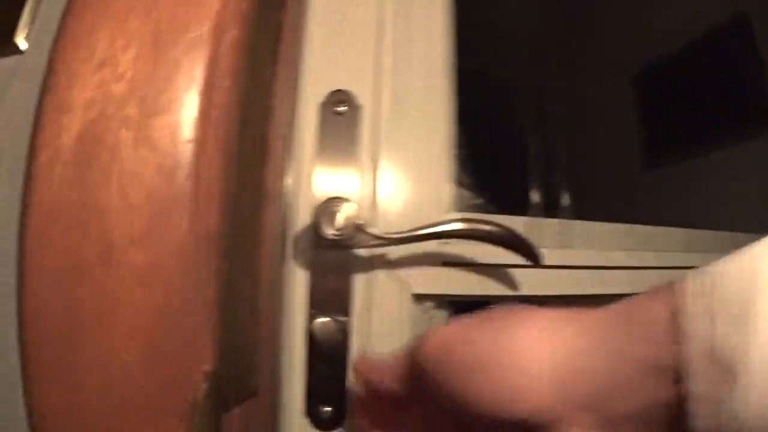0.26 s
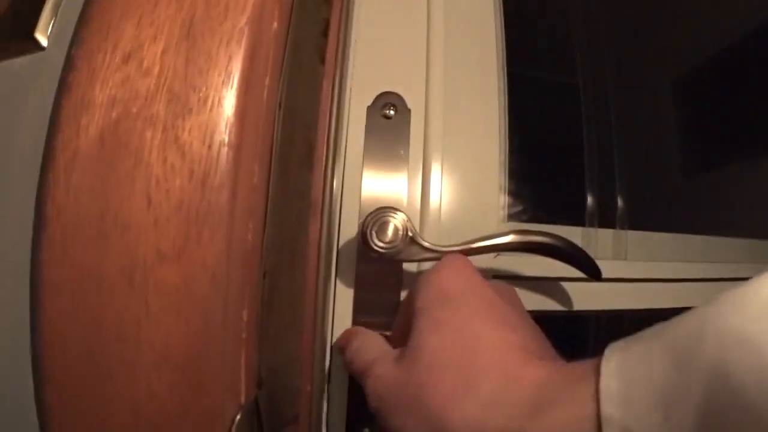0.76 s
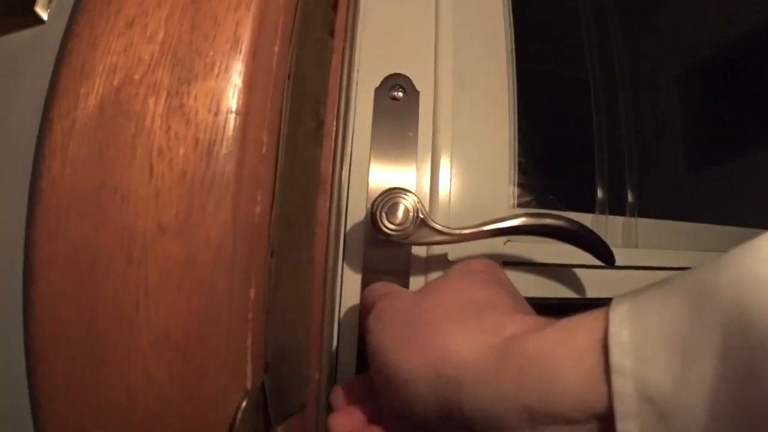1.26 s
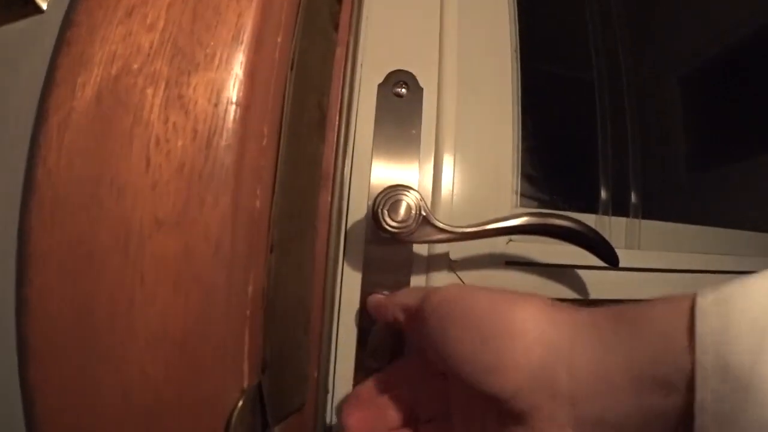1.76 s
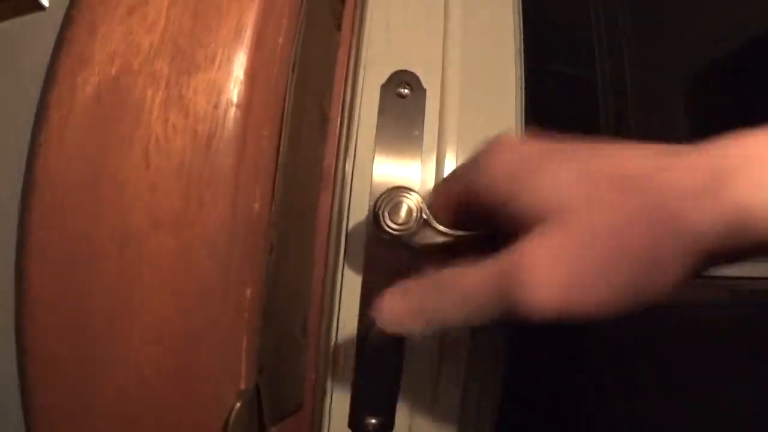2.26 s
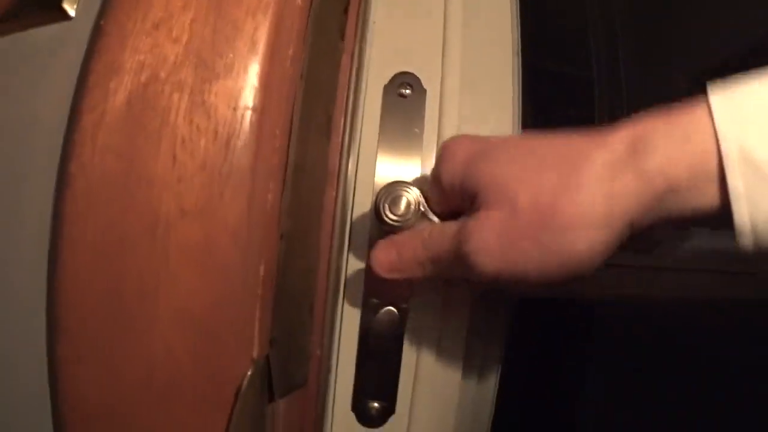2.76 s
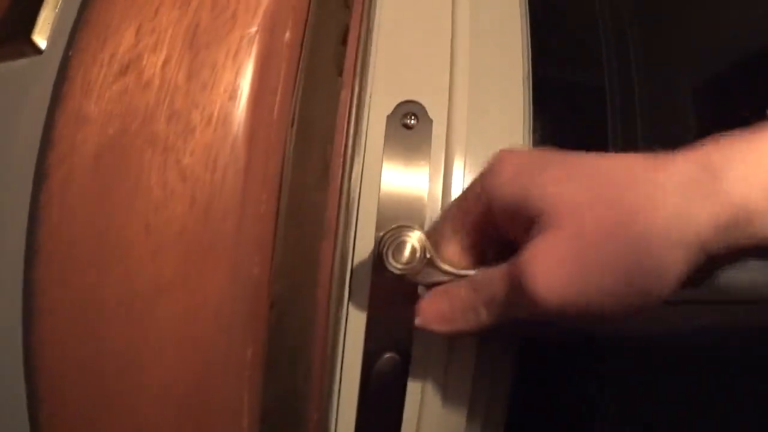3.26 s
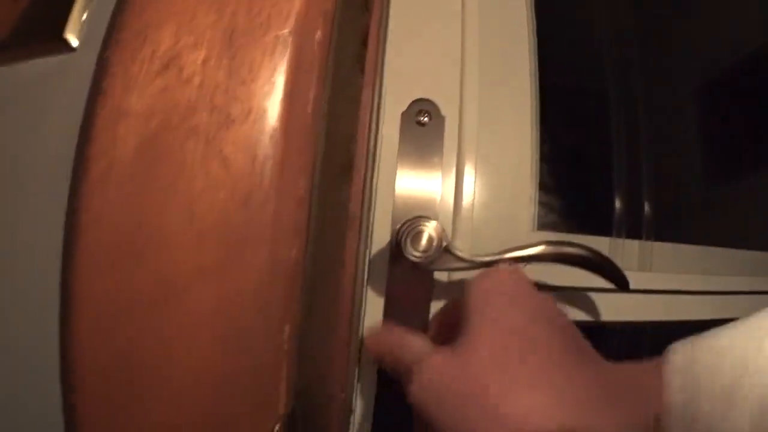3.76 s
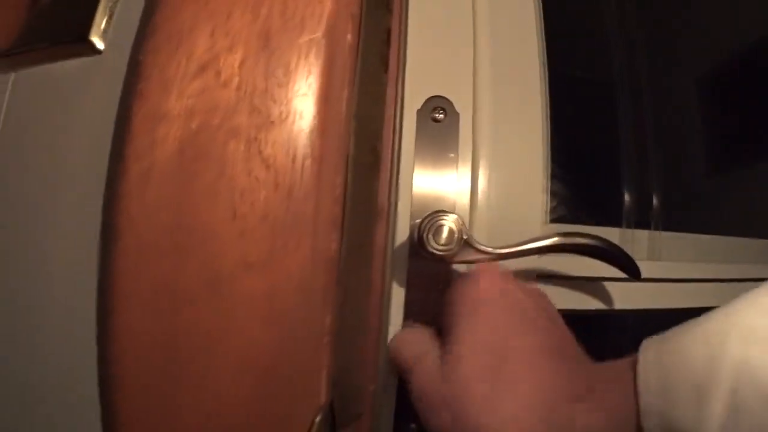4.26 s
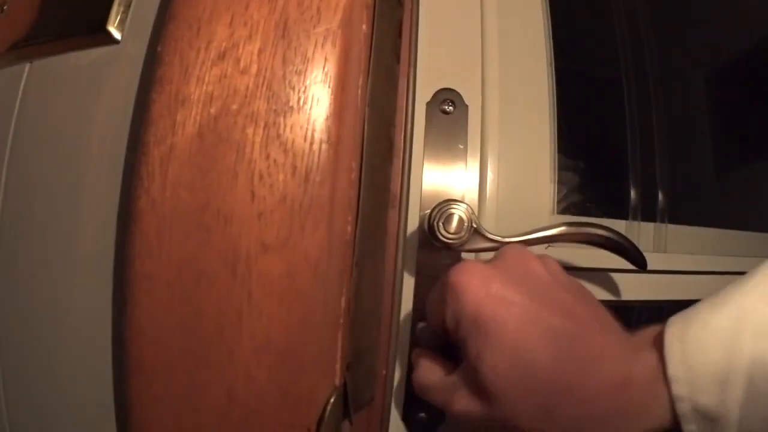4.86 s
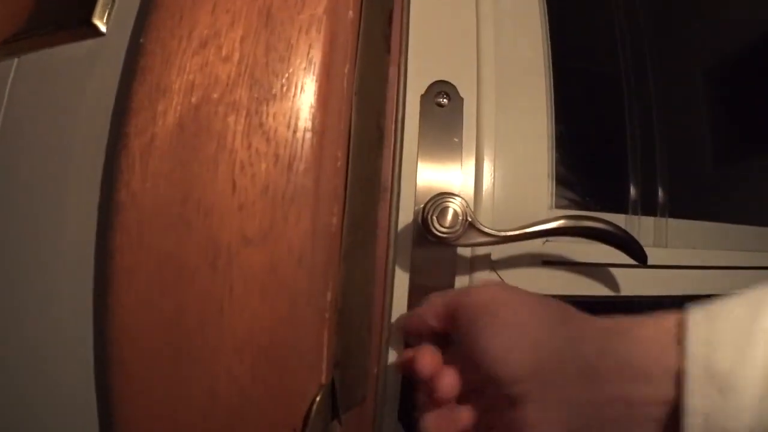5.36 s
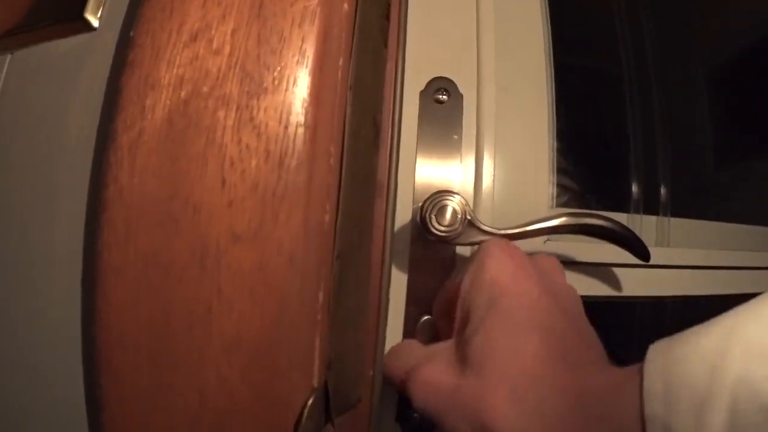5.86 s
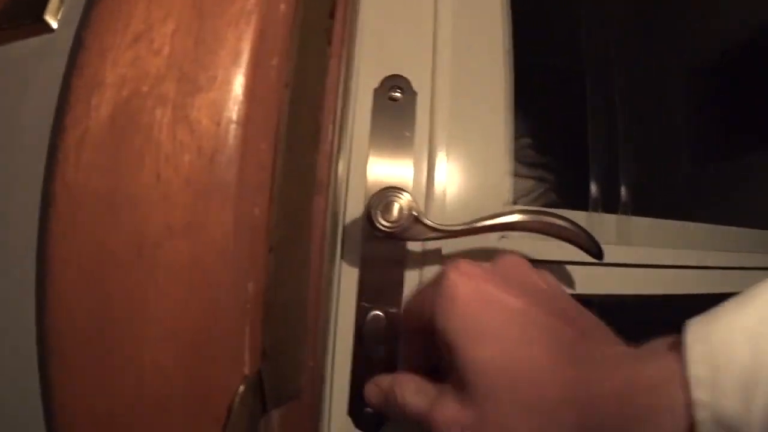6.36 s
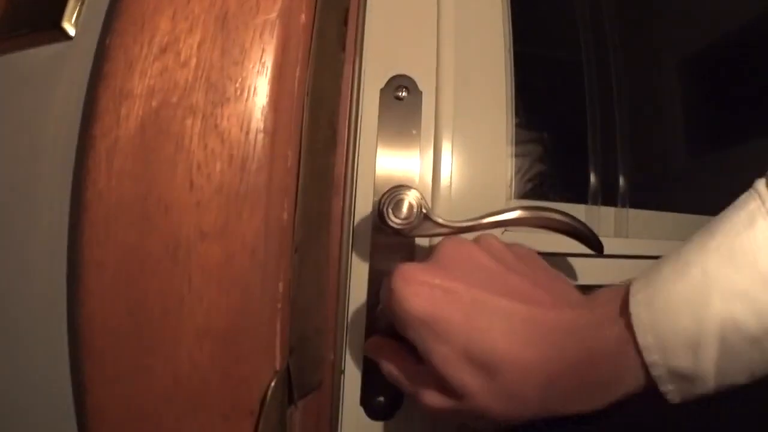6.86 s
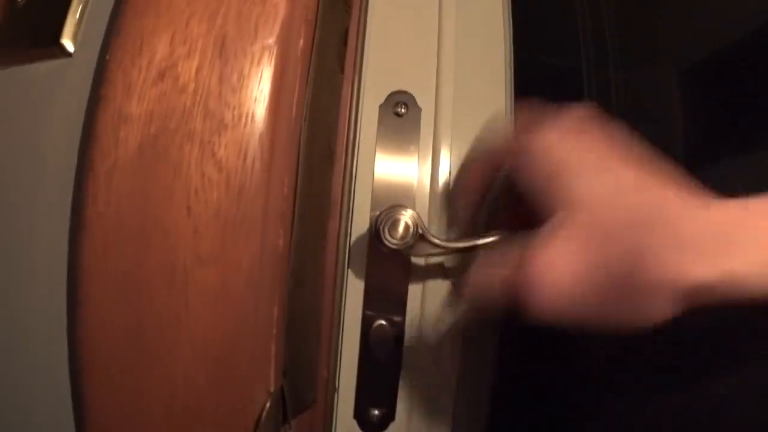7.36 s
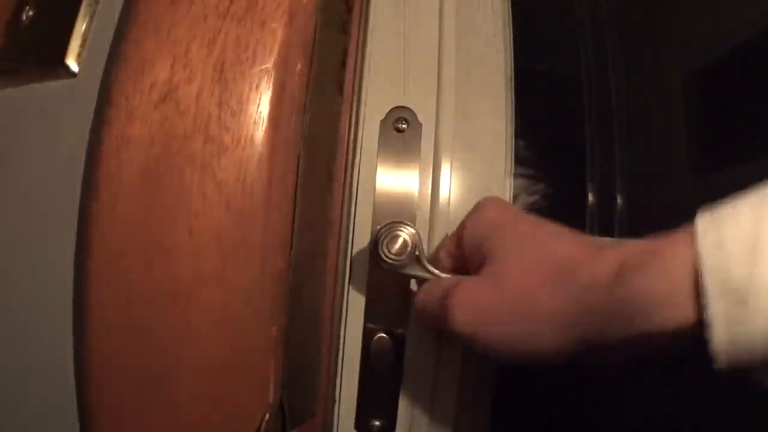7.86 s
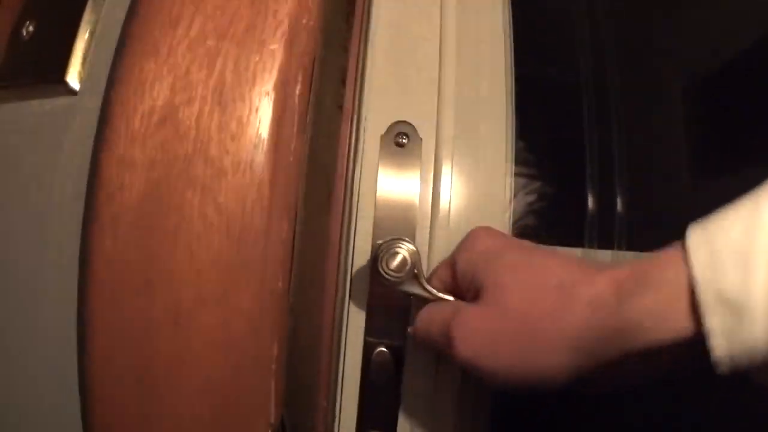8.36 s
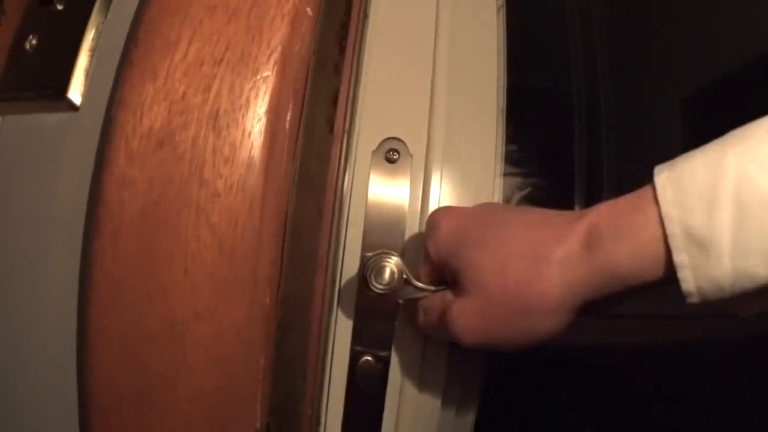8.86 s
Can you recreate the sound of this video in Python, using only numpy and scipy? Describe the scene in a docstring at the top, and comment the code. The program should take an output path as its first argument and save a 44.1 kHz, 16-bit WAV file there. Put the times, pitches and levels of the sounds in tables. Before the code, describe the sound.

Very close to a wooden door's metal lock and lever handle in a quiet, small room. A dense, loud rattle opens it, then sparse clicks and sharp clacks with short woody knocks, a cluster of hard blows with a brief metallic ring past the middle, a near-silent lull, and a busy run of smaller rattles at the end. Hand-held stereo microphone, low grip rumble, soft thumps and constant hiss.

```python
"""Close in on the lock and lever handle of a wooden door in a quiet house: nine seconds, hand-held stereo recorder.
A dense rattle opens it, then come scattered contacts, harder blows near 3.1, 3.8 and 5.4 s, a lull, and a busy end.
Each contact is a noise burst through resonances of lever, lock, wood and leaf, with a small room's answer;
snaps, slides and free ringing of the lever join in. Throughout, the grip rumbles and thumps under steady hiss,
and the stereo image is wide in the middle tones."""
import sys
import numpy as np
from scipy import signal
from scipy.fft import rfft, irfft, next_fast_len
from scipy.io import wavfile
from scipy.ndimage import uniform_filter1d, map_coordinates

SR = 44100
rng = np.random.default_rng(int(sys.argv[2]) if len(sys.argv) > 2 else 0)


def digitize_waveform(pressure):
    """Quantize a signal to 16-bit integers and store it at the path in sys.argv[1].

    Rows of a 2-D input are taken as channels; values are limited to [-1, 1].
    """
    field = np.atleast_2d(pressure).T
    bounded = np.clip(field, -1, 1)
    quanta = np.round(bounded * 32767).astype(np.int16)
    wavfile.write(sys.argv[1], SR, quanta)


N = 402191  # samples

# Contacts in the lock. Each row: start in seconds, level in dB, share reaching the wood in dB,
# bright lever tick in dB, rattle length in seconds.
CONTACTS = [(0.0, -12.5, -10, -2, 0.026), (.03, -14, -3.5, -4, 0.042), (.058, -12, 2.5, -15.5, 0.026),
            (.087, -27.5, 14, 8.5, 0.026), (.117, -13.5, 1.5, -5, 0.027), (.164, -25, 10.5, -5, 0.026),
            (.192, -14, 8, -7, 0.015), (.242, -17, -6, -12, 0.011), (.301, -24.5, 2, 1.5, 0.011),
            (.732, -28, 0.5, -11, 0.017), (.949, -11, 1.5, -5.5, 0.028), (1.035, -26.5, -1, -12, 0.016),
            (1.106, -28, -1.5, -6.5, 0.019), (1.498, -33.5, -10, -6, 0.0068), (1.583, -36, 3, -34, 0.016),
            (1.63, -35, -1, -24, 0.011), (2.262, -32, 6.5, -3, 0.021), (2.404, -32, -2.5, -7, 0.024),
            (2.434, -30, 3, -3, 0.013), (2.457, -39.5, 9.5, 9, 0.019), (2.515, -30, 9, -32, 0.013),
            (2.566, -41, 6, -2.5, 0.021), (2.751, -20, 3.5, -27, 0.015), (2.803, -42.5, -7, -9, 0.05),
            (3.037, -26.5, -5, -9, 0.03), (3.063, -13.5, -7, -2, 0.016), (3.101, -25, 2.5, -6, 0.017),
            (3.746, -28, 7.5, -11, 0.019), (3.758, -12, -1.5, -4.5, 0.0092), (3.931, -37, 0.5, -2.5, 0.018),
            (4.205, -40.5, 2, -5, 0.047), (4.257, -25.5, 4, -38, 0.012), (4.596, -33, -8, -9, .022),
            (5.314, -44, 9, -25, .015), (5.353, -11.5, 3.5, -7, 0.021), (5.456, -27.5, 7.5, -2, 0.014),
            (5.605, -12.5, -4, -6, 0.017), (5.62, -17, -1.5, -1, 0.026), (5.693, -20.5, 0.5, -14, 0.022),
            (6.008, -36, 8.5, -32, 0.013), (6.534, -50, 3, 2.5, 0.042), (7.027, -37.5, 11, -5.5, .015),
            (7.071, -36.5, 1, -9, .013), (7.41, -25, 10, -14, 0.02), (7.549, -38, -5, -10, 0.013),
            (7.673, -35, 2.5, -11, .029), (7.702, -29, -4, -10, 0.017), (7.822, -21, -6.5, -5, 0.017),
            (7.885, -25, -8, -31, 0.022), (7.897, -21, -10, -7, 0.016), (7.906, -25, 9.5, -15, 0.019),
            (8.003, -19.5, -6, -2.5, 0.018), (8.064, -22.5, -8, -3.5, .022), (8.097, -16.5, 5, -9.5, .014),
            (8.2, -23.5, -6, 0, 0.021), (8.248, -22.5, -6, -14.5, 0.024), (8.276, -17, 6, -12.5, 0.015),
            (8.408, -25, -8, -4.5, 0.033), (8.435, -17, -6, 2.5, 0.012), (8.487, -27.5, -1.5, -12, 0.05),
            (8.541, -19, 4.5, -12.5, 0.02), (8.57, -29, 11, -9.5, 0.014), (8.792, -17.5, -16, -17.5, 0.022),
            (8.809, -13.5, -3, -5.5, .014), (8.996, -27, -2, -22, 0.022), (9.005, -13.5, -8.5, -5, 0.018),
            (9.039, -17.5, 7.5, -11.5, .026)]
# Single hard ticks of part on part. Each row: start in seconds, level in dB, pitch in Hz.
SNAPS = [(0.074, -13, 1430), (0.113, -9.5, 2900), (0.198, -29, 1310), (1.112, -25, 2590),
         (2.435, -13, 2130), (3.76, -15.5, 2080), (3.071, -16, 2280), (5.354, -9.5, 1350),
         (5.608, -15, 2560), (5.623, -9, 3000), (7.918, -23, 1210), (8.005, -28, 3470), (8.201, -29, 4000),
         (8.285, -20, 1200), (8.436, -18, 2070), (8.545, -15.5, 2470), (9.04, -19, 1500)]
# Sliding parts. Each row: start in seconds, length held in seconds, level in dB.
SLIDES = [(0.0, 0.22, -29.5), (.98, 0.11, -44.5), (2.378, 0.31, -53), (3.905, 0.046, -53),
          (4.15, 0.086, -49.5), (4.555, 0.049, -50.5), (5.226, 0.14, -57.5), (5.42, 0.148, -42.5),
          (7.9, 1.2, -59.5)]
# Blows that leave the lever ringing. Each row: start in seconds, level in dB.
LEVER_RINGS = [(.001, -24), (.145, -37), (5.607, -16.5), (5.622, -22), (5.694, -34)]
# Lever with no hand damping it. Each row: frequency in Hz, level in dB, time to fall 60 dB in seconds.
FREE_LEVER_MODES = [(690, -11, .22), (1152, -5, .3), (1680, -8, .11), (2150, -9, .15), (2977, -6, .22),
                    (3400, -11, .2), (4900, -11, .2), (5300, -11, .25), (5550, -11, .28), (5900, -11, .3),
                    (6400, -12, .28), (7709, -13, .15), (8936, -11, .18)]

# Resonances of the damped lever and plate, the damped lock case, the wood around the lock and the door leaf.
# Each row: frequency in Hz, width in Hz, level in dB.
LEVER_MODES = [(2660, 700, 1), (5010, 2100, 5), (5990, 860, 8), (7880, 2420, 2.5), (10130, 8700, -2.5)]
LOCK_MODES = [(1123, 280, 4.5), (1420, 483, 9.5), (2113, 1045, 3.5)]
STILE_MODES = [(478, 245, -6), (730, 136, 9), (822, 324, 2), (1156, 120, 4)]
LEAF_MODES = [(110, 61, 3), (200, 167, 4.5), (356, 384, -3.5)]
# Decay of the small room. Each row: frequency in Hz, time to fall 60 dB in seconds.
ROOM_DECAY = [(150, 0.58), (1000, 0.21), (3000, 0.2), (9000, 0.12)]

# Thumps of the grip. Each row: start in seconds, level in dB, sharp edge in dB against the thump.
THUMPS = [(.093, -20, -18), (.435, -25.5, -12), (.811, -17.5, -6), (1.163, -26.5, -31), (2.923, -27.5, -15),
          (2.984, -23.5, -30), (3.125, -22.5, -27), (3.245, -18.5, -26), (3.319, -18.5, 2),
          (4.189, -22.5, -4.5), (5.244, -22.5, -9), (6.006, -27, -18), (6.201, -25, -9), (6.859, -31, -33),
          (7.28, -20.5, -30), (7.902, -22, -26), (8.12, -23.5, -7), (8.763, -24.5, -25), (9.041, -22, -17)]
# Course of the grip rumble. Each row: time in seconds, level in dB.
GRIP_LEVEL = [(0.0, -40), (.33, -33.5), (.48, -37.5), (2.2, -36), (3.43, -33), (3.94, -38), (6.8, -38),
              (7.42, -38), (8.3, -37), (9.12, -32.5)]
# Spectrum shapes of grip rumble, and of room air with microphone noise.
# Each row: frequency in Hz, relative density in dB per Hz.
RUMBLE_SPECTRUM = [(8.8, -9), (15, 3), (43, -7), (76, -2.5), (118, -14), (147, -25), (260, -32), (340, -72),
                   (570, -120)]
HISS_SPECTRUM = [(150, -33), (250, -3.5), (293, -2.5), (552, -6.5), (769, -7), (873, -8.5), (1380, -7.5),
                 (8670, -15), (11000, -15), (14300, -37), (22000, -120)]
# Stereo image: how the left-right difference follows the sum, for door, grip and hiss.
# Each row: frequency in Hz, level against the sum in dB, likeness from 0 to 1, phase in radians.
DOOR_IMAGE = [(80, -5, .6, -1.6), (150, -1.2, .8, -1.6), (300, 4, .9, -1.6), (600, 8.5, .87, -1.75),
              (900, 11.5, .75, -2.2), (1200, 12, .8, -2.9), (1450, 5.5, .86, -3.5), (1900, -2.5, .72, -3.5),
              (2600, -4.5, .36, -2.6), (5000, -6.4, .47, -2.1), (10500, -8.4, .4, -2.1)]
GRIP_IMAGE = [(40, -12.5, 0.93, 2.1), (80, -4.5, 0.93, 1.82), (150, 1.5, 1, 1.73), (600, 9, .9, 1.5),
              (2000, 15, .9, 1.7)]
HISS_IMAGE = [(300, 7.5, 0.54, -1.7), (700, 11.5, .4, -1.5), (1100, 10, .35, -2.5), (1500, 6, 0.42, -3),
              (2600, 2, .15, -2), (5000, -1.3, .15, -2.5), (10500, -6, .22, -2)]

CASE_DB = 2.5  # lock case
LEAF_DB, LEAF_GROWS = -0.5, 1.93  # leaf at a wood share of 0 dB; leaf dB per dB of wood share
SLIDE_FADE_DB_PER_S = 132
THUMP_HZ, THUMP_SPREAD = 81, 0.07  # swing of the recorder case; random scatter as a fraction
HISS_DB = -58
TOP_HZ = 11050  # band limit
FFT_SIZE = 2 ** 15  # samples for one contact with its room tail


def lock(room_db, grit_db, fall, rise_s):
    """Loose metal rattles in tiny impacts; the light lever speaks at once, the heavy parts build up."""
    out = np.zeros((2, N + FFT_SIZE))
    t = np.arange(SR // 5) / SR
    hz = np.fft.rfftfreq(FFT_SIZE, 1 / SR)
    tails = room_tails(count=8)
    rises = 1 - np.exp(-t / np.reshape(rise_s, (2, 1, 1)))  # lever, then body
    for k, (start, db, wood_db, tick_db, length) in enumerate(CONTACTS):
        shape = np.exp(-(t / max(length, .001)) ** fall)
        grit = shape * amp(grit_db * wobble(517, count=len(t)))  # loose parts chatter unevenly
        grit *= np.linalg.norm(shape) / np.linalg.norm(grit)  # same energy as the smooth shape
        burst = amp(db) * rises * grit * rng.standard_normal((2, len(t)))
        paths = door_paths(hz, wood_db, tick_db, scatter_db=1.5)
        direct = np.sum(rfft(burst, FFT_SIZE) * paths[:, None], axis=0)
        in_room = direct * (1 + amp(room_db) * tails[k % len(tails)])
        out[:, round(start * SR):][:, :FFT_SIZE] += irfft(in_room, FFT_SIZE)
    return out[:, :N]


def snaps(cycles):
    """One part strikes another once: a damped swing that falls to 1/e in the given number of cycles."""
    out = np.zeros((2, N + SR))
    t = np.arange(SR // 50) / SR
    for start, db, hz in SNAPS:
        swing = np.sin(2 * np.pi * hz * t) * np.exp(-t * hz / cycles)
        out[:, round(start * SR):][:, :len(t)] += amp(db) * swing
    return out[:, :N]


def scrape(grit_db):
    """Spindle and latch bolt slide in the case: fine grains through the door's parts, held, then fading."""
    t = np.arange(N) / SR
    level = np.zeros(N)
    for start, length, db in SLIDES:
        fade_db = SLIDE_FADE_DB_PER_S * np.maximum(t - start - length, 0)
        level += (t >= start) * amp(db - fade_db)
    grains = unit(amp(grit_db * wobble(120, count=N)) * rng.standard_normal((2, N)))

    def parts(hz):
        return door_paths(hz, wood_db=5.0, tick_db=-8.0, scatter_db=0).sum(axis=0)
    return uniform_filter1d(level, 900) * unit(filtered(grains, parts))  # onsets eased over 20 ms


def lever():
    """The undamped lever hangs on after a blow in thin metallic lines that waver slightly."""
    out = np.zeros((2, N + SR))
    t = np.arange(SR // 2) / SR
    for start, db in LEVER_RINGS:
        for hz, mode_db, t60 in FREE_LEVER_MODES:
            phase = 2 * np.pi * (hz * t + rng.random((2, 1)))
            phase = phase + (.7 + hz / 2500) * wobble(60, count=len(t))  # higher lines waver more
            decay = amp(db + mode_db + rng.normal(0, 1.5) - 60 * t / t60)
            ring = decay * np.sin(phase)
            out[:, round(start * SR):][:, :len(t)] += ring * (1 - np.exp(-t / 0.0051))
    return out[:, :N]


def door_paths(hz, wood_db, tick_db, scatter_db):
    """Two paths: the bright lever, and the heavier lock case, surrounding wood and door leaf."""
    body = amp(CASE_DB) * modes(LOCK_MODES, hz, scatter_db)
    body += amp(wood_db) * modes(STILE_MODES, hz, scatter_db)
    body += amp(LEAF_DB + LEAF_GROWS * wood_db) * modes(LEAF_MODES, hz, scatter_db)
    return np.array([amp(tick_db) * modes(LEVER_MODES, hz, scatter_db), body])


def modes(table, hz, scatter_db):
    """Causal response of a set of resonances with alternating sign, each excited at a new strength."""
    chance = rng.standard_normal(len(table))
    total = 0
    for k, (centre, width, db) in enumerate(table):
        strength = (-1) ** k * amp(db + scatter_db * chance[k])
        damping = 1j * hz * width
        total = total + strength * damping / (centre * centre - hz * hz + damping)
    return total


def room_tails(count):
    """Spectra of several small-room answers: noise in which each frequency dies at its own speed."""
    hz, t, bins = signal.stft(rng.standard_normal((count, 2, SR // 2)), SR, nperseg=256)
    decay = amp(-60 * t / along(ROOM_DECAY, hz)[0][:, None])
    tail = signal.istft(bins * decay, SR, nperseg=256)[1]
    tail /= np.linalg.norm(tail, axis=-1, keepdims=True)
    return rfft(np.pad(tail, [(0, 0), (0, 0), (220, 0)]), FFT_SIZE)  # first walls 5 ms later


def grip():
    """Fingers shift on the recorder: lumpy rumble, and single pushes that swing once or twice."""
    times, db = np.transpose(GRIP_LEVEL)
    level = amp(np.interp(np.arange(N) / SR, times, db) + 2.5 * wobble(14, count=N))
    noise = filtered(rng.standard_normal((2, N)), lambda hz: amp(along(RUMBLE_SPECTRUM, hz)[0]))
    out = np.pad(level * unit(noise), [(0, 0), (0, SR)])
    t = np.arange(SR // 8) / SR
    for start, db, edge_db in THUMPS:
        turns = t * THUMP_HZ * (1 + THUMP_SPREAD * rng.standard_normal())
        swing = np.sin(2 * np.pi * turns) * 6.7 * turns * np.exp(-2.38 * turns)
        edge = amp(edge_db) * np.exp(-t / 0.0037) * (1 - np.exp(-t / 0.00023)) ** 2
        out[0, round(start * SR):][:len(t)] += amp(db) * (swing + edge)
    return ports(out[:, :N], GRIP_IMAGE)


def hiss():
    """Steady air of the room and the microphone's own noise, as shaped random noise."""
    noise = filtered(rng.standard_normal((2, N)), lambda hz: amp(along(HISS_SPECTRUM, hz)[0]))
    return ports(amp(HISS_DB) * unit(noise), HISS_IMAGE)


def ports(pair, image):
    """Left and right: the first sound is common, and both sounds are blended into the difference."""
    def mix(hz):
        db, like, phase = along(image, hz)
        like = np.clip(like, 0, 1)
        return amp(db) * np.array([like * np.exp(1j * phase), np.sqrt(1 - like ** 2)])
    side = filtered(pair, mix).sum(axis=0)
    return np.array([pair[0] + side, pair[0] - side])


def amp(db):
    """Decibels to amplitude."""
    return 10 ** (np.asarray(db) / 20)


def unit(x):
    """Scale to an RMS of one."""
    return x / np.sqrt(np.mean(x ** 2) + 1e-20)


def along(points, hz):
    """Each column after the frequency, read on a log axis."""
    f, *columns = np.transpose(points)
    return [np.interp(np.log(hz + 1), np.log(f + 1), column) for column in columns]


def wobble(rate, count):
    """A smooth random curve of count samples, rate knots a second."""
    knots = rng.standard_normal(int(count * rate / SR) + 4)
    return map_coordinates(knots, [np.arange(count) * rate / SR])


def filtered(x, response):
    """Apply a complex response of frequency to x."""
    size = next_fast_len(N + SR // 2)
    spectrum = rfft(x, size) * response(np.fft.rfftfreq(size, 1 / SR))
    return irfft(spectrum, size)[..., :N]


def scene():
    """The door up close, the grip on the recorder and the quiet air behind."""
    door = lock(room_db=-9.0, grit_db=2.5, fall=1.36, rise_s=[.0007, .005])
    door += snaps(cycles=3.6) + scrape(grit_db=3.0) + lever()
    return ports(door, DOOR_IMAGE) + grip() + hiss()


def record(dry):
    """Peaks round off near full scale; a steep filter then removes what lies above the band limit."""
    soft = dry / (1 + np.abs(dry) ** 6) ** (1 / 6)
    return filtered(soft, lambda hz: 1 / (1 + (hz / TOP_HZ) ** 300))


dry = scene()
out = record(dry)
digitize_waveform(out)
```